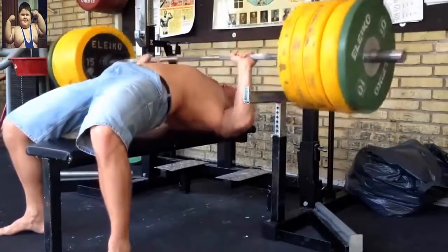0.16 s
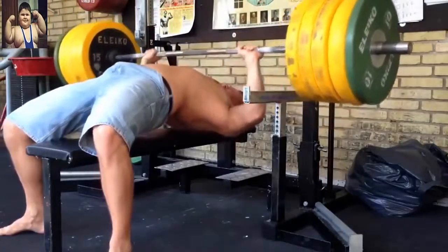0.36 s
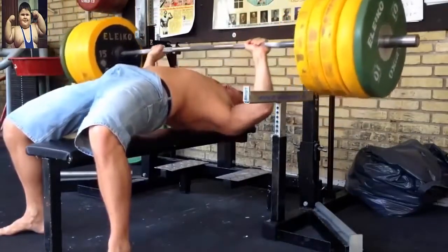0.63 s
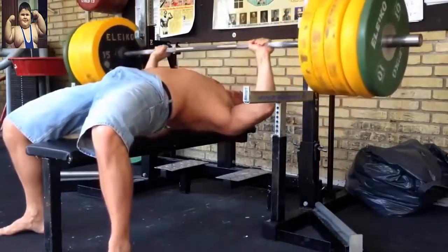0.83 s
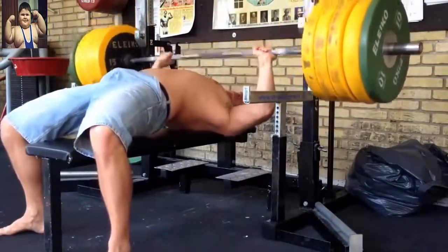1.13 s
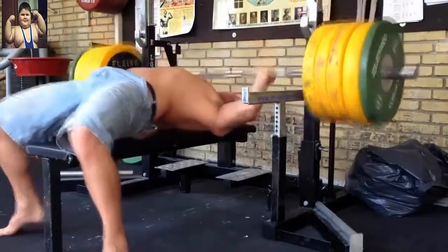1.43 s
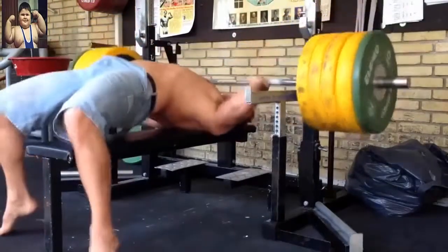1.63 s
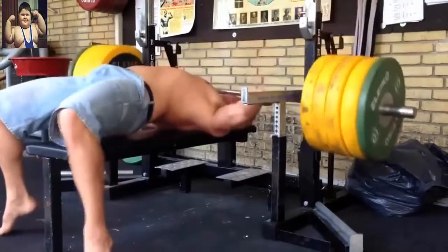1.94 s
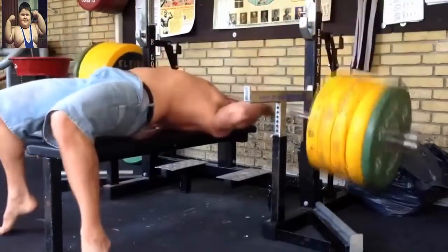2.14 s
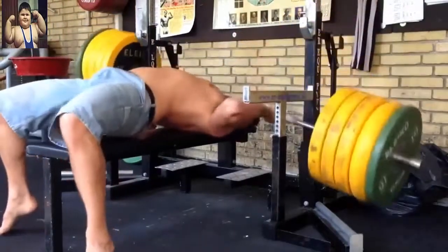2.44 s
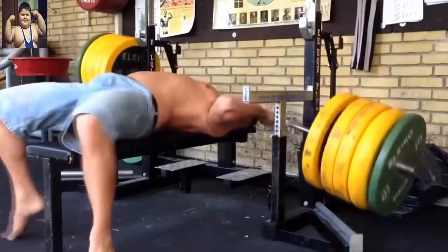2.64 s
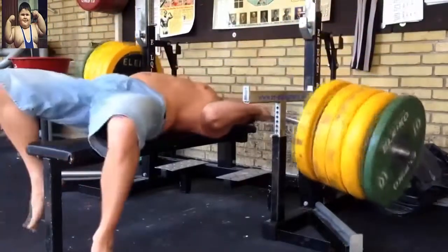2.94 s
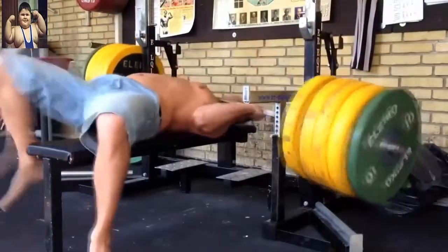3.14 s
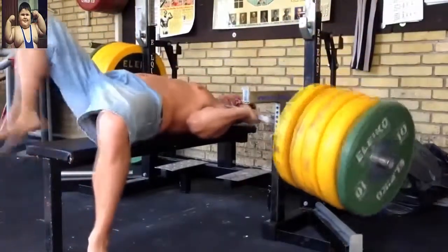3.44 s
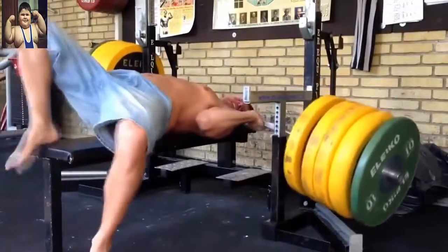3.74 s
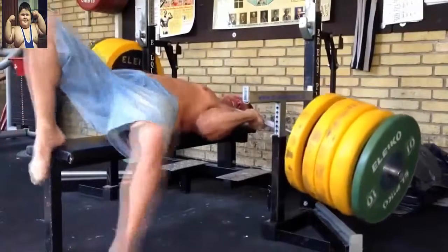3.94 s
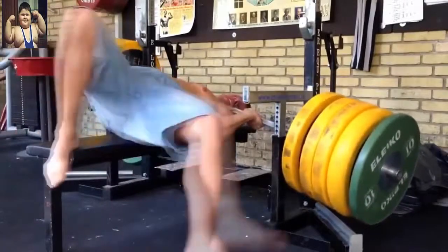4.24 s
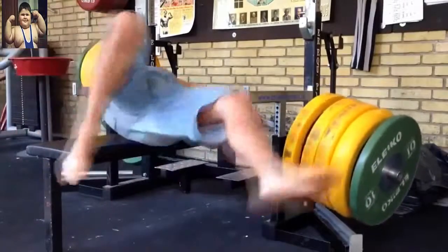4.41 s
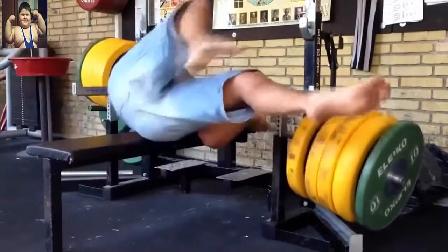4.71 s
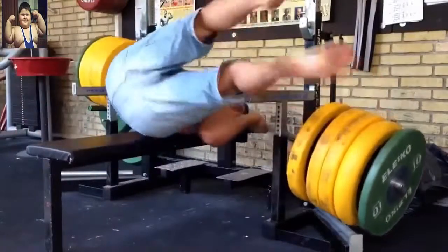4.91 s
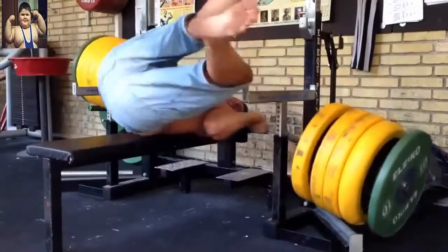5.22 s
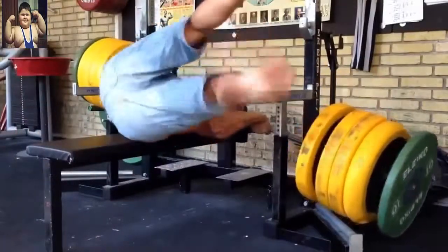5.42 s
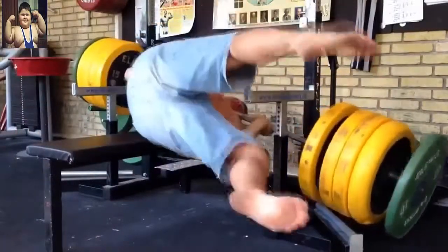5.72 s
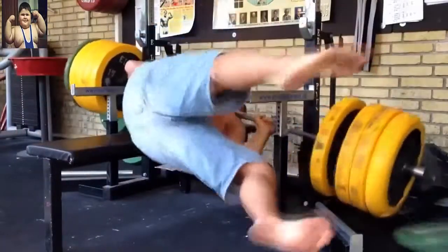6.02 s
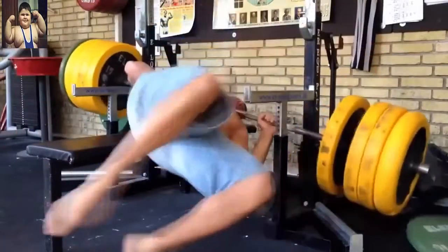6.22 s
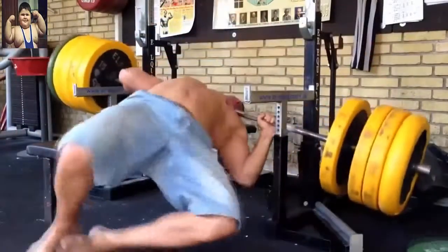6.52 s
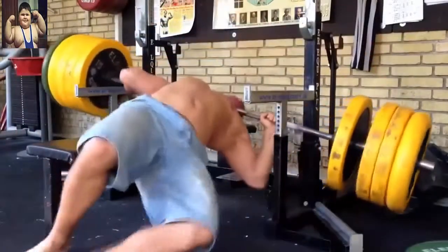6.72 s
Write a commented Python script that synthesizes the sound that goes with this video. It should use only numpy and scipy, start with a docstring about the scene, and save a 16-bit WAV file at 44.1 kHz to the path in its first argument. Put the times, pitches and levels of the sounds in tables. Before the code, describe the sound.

Faint bird chirps over quiet room hum, then a loaded barbell crashes on a steel rack with harsh clanging, rattles, thuds and late heavy plate knocks.

```python
"""In a small brick-walled gym a loaded barbell drops onto the steel arms of a rack, bounces, tips and slides.
Loose sleeves and rack rattle, rubber plates knock and thud on the floor mats: contact forces drive
decaying modes and broad knocks. Before the first crash a bird, hoarse gliding sines, chirps outside
over a faint room hum of shaped noise."""
import sys
import numpy as np
from scipy import signal
from scipy.fft import rfft, irfft, next_fast_len
from scipy.io import wavfile
from scipy.ndimage import uniform_filter1d

SR = 44100
rng = np.random.default_rng(int(sys.argv[2]) if len(sys.argv) > 2 else 0)


def master(y):
    """Save y as 16-bit WAV."""
    cut = np.clip(np.atleast_2d(y).T, -1, 1)
    pcm = np.round(cut * 32767)  # scale
    wavfile.write(sys.argv[1], SR, pcm.astype(np.int16))


N = 302681

# room hum spectrum, relative: freq_hz, density_db
HUM_SPECTRUM = [(13, -52), (22, -21.5), (38, -17.5), (139, -12.5), (177, -2.5), (224, -16), (277, -11.5),
                (469, -15), (955, -22), (2810, -28), (7080, -34), (12000, -58), (15600, -90), (22000, -120)]
# bird, one table a chirp: time_s, pitch_hz, level_db
CHIRPS = [
    [(0.72, 4530, -75), (0.748, 4265, -63.5), (0.86, 4280, -81)],
    [(0.97, 3960, -71), (1.006, 3350, -60), (1.09, 3450, -63.5)],
    [(1.13, 3870, -86), (1.136, 4080, -70), (1.25, 3350, -63.5)],
]
# blows: start_s, rack_db, bar_db, plate_db, rattle_t60_s (before the plates' factor), swell_ms, steel_focus_hz
BLOWS = [(1.2486, -42.5, -63, -69, 0.18, 3.6, 3180), (1.2981, -9.5, -18.5, -21.5, 0.96, 1.6, 2380),
         (1.3513, -15.5, -13.5, -27.5, 0.26, 3.4, 3860), (1.3882, -9.5, -23, -27.5, 0.13, 1.8, 1880),
         (1.5575, 1.5, -11, -35, 0.26, 20, 1620), (1.7895, -8.5, -21.5, -26, 0.49, 1.8, 1900),
         (1.9486, -13.5, -23.5, -23.5, 0.31, 4.3, 1060), (1.984, -27, -47, -27, 0.15, 9.1, 1900),
         (2.0573, -15, -20.5, -27, .19, 3.2, 2230), (2.1188, -28, -39, -25.5, 0.23, 4.1, 1980),
         (2.194, -22, -36, -26, 0.31, 4.1, 2080), (2.445, -22, -30, -38.5, 0.43, 1.2, 2950),
         (2.7085, -63, -62, -36, 0.051, 3.8, 2920), (3.015, -35.5, -48.5, -72.5, 1, 9.1, 1710),
         (3.1097, -29.5, -35.5, -37.5, 0.32, 4, 2200), (3.2147, -31, -60.5, -42, 0.24, 6.4, 2550),
         (3.2634, -25, -57.5, -36.5, 1, 16, 2420), (3.3727, -14, -17.5, -24.5, .16, 21, 2160),
         (3.3989, -14, -23, -32, 0.14, 2.9, 2220), (3.5299, -14.5, -20, -32.5, 0.34, 4, 1400),
         (4.3682, -60.5, -62.5, -51.5, 0.22, 7.6, 1070), (4.4485, -35.5, -64, -52.5, 1, 5.9, 2550),
         (4.488, -33, -36.5, -40.5, 0.64, 2.1, 2960), (4.5143, -28, -37, -46, 0.25, 3.9, 1610),
         (4.585, -33, -42, -38, 0.16, 7.3, 2460), (4.7118, -28, -31.5, -32.5, 0.2, 4.6, 960),
         (4.787, -47, -38.5, -49, 0.26, 2.5, 1510), (4.8677, -25.5, -34.5, -49, 0.44, 3.5, 2970),
         (4.921, -26.5, -31, -54, 0.18, 9.8, 2860), (5.1018, -63, -49, -43, 0.8, 1.5, 900),
         (5.1366, -18, -24.5, -32, 0.37, 6.2, 1090), (5.4492, -40, -34.5, -42, 0.2, 9.7, 1050),
         (5.468, -37, -29.5, -77, 0.13, 3.1, 1210), (5.5762, -29, -30, -43.5, 0.22, 4, 4250),
         (5.679, -42, -42, -49.5, 0.17, 3.9, 2900), (5.7955, -35.5, -38, -41, 0.24, 3.5, 3560),
         (5.9327, -32, -39, -33.5, 0.072, 1.5, 1880), (6.106, -34, -35.5, -57, 0.98, 27, 2840),
         (6.1554, -35, -32.5, -50, 0.58, 3.8, 3050), (6.1937, -14, -14.5, -11, 0.15, 3, 1010),
         (6.276, -38, -36, -37, 0.061, 4.6, 3000), (6.3483, -23.5, -48, -36, 0.1, 5.5, 3130),
         (6.495, -7, -14, -9, 0.076, 2.3, 923), (6.522, -30, -41, -14, 0.075, 3.2, 923),
         (6.5878, -22.5, -25, -26, 0.41, 12, 3670), (6.66, -48, -25.5, -20, 0.24, 7, 950)]
# sliding and shaking between blows, one table a spell: time_s, bar_db
SLIDES = [
    [(1.4, -41), (1.508, -24), (2.8, -52.5)],
    [(2.95, -56), (3.29, -29), (3.5, -40.5)],
    [(4.55, -43), (4.636, -55.5), (5.05, -57.5)],
    [(5.85, -49), (6.55, -36), (6.86, -69)],
]
# thuds of the load in the floor slab: start_s, level_db
THUDS = [(1.298, -32), (1.559, -18), (1.7875, -15.5), (1.9494, -30), (2.058, -26), (2.1205, -20),
         (2.195, -23), (3.084, -29), (3.1114, -26), (3.416, -27), (3.472, -27.5), (3.5299, -32),
         (4.7114, -31), (4.741, -26.5), (5.1389, -24), (5.4486, -44), (5.722, -31.5), (6, -21),
         (6.036, -35), (6.092, -34), (6.1557, -21), (6.1916, -24), (6.3573, -42), (6.4951, -40),
         (6.6654, -35)]
# shaping of clashing steel: freq_hz, gain_db
STEEL_COLOUR = [(290, -25.5), (500, -13), (611, 0), (667, -3.5), (1040, -3.5), (1310, -4), (1580, -5.5),
                (4020, 0.5), (5440, -7), (7670, -14.5), (8990, -24.5), (10400, -48.5), (15500, -45.5)]
# modes of the steel rack: freq_hz
RACK_MODES_HZ = [2188, 2440, 2684, 2822, 3110, 3237, 3560, 3900, 4080, 4820]
# modes of the bar: freq_hz
BAR_MODES_HZ = [830, 1060, 1183, 1315, 1534, 1620, 1744, 1900]
# modes of the rubber plates: freq_hz
PLATE_MODES_HZ = [233, 258, 331.6, 400, 472.7, 528, 611.6, 843]
# modes of the floor slab: freq_hz
FLOOR_MODES_HZ = [57.8, 74.4, 105, 132]
# echo decay: freq_hz, t60_s
ROOM_DECAY = [(80, 1), (400, 0.65), (1500, 0.53), (4000, 0.42), (9500, 0.3)]

HUM_DB, HUM_WANDER_DB = -60.5, 1.5
# sliding level against the bar
RACK_SLIDE_DB, PLATE_SLIDE_DB, FLOOR_SLIDE_DB = -0.5, -4.5, -15.5
# modes against the broad knock
RACK_RING_DB, BAR_RING_DB, FLOOR_RING_DB = -11, -8.5, -15.0
STACKED_RING_DB, LOOSE_RING_DB = -3.5, -2.5
# plates ring low while stacked on the bar, higher once the outer one is off and slaps flat
STACKED_FOCUS_HZ, LOOSE_FOCUS_HZ, PLATE_OFF_S = 315, 444, 6.1
STEEL_T60_S, PLATE_T60_S, FLOOR_T60_S = 0.035, 0.09, 0.2
# contact click against the rattle, before the cut for slow swells
STEEL_TICK_DB, PLATE_TICK_DB, FLOOR_TICK_DB = 19.5, 22, 28
THUD_T60_S, THUD_SWELL_MS = 0.16, 15
RACK_FOCUS_OCT, BAR_FOCUS_OCT, PLATE_FOCUS_OCT, FLOOR_FOCUS_OCT = 0.17, 0.3, 0.2, 0.15
TOP_HZ = 15650


def undb(db):
    """dB to gain."""
    return 10 ** (np.asarray(db) / 20)


def colour(x, table):
    """Shape by freq_hz, gain_db points joined on a log-frequency axis."""
    size = next_fast_len(len(x) + 2048)
    hz, db = np.transpose(table)
    bin_hz = np.arange(size // 2 + 1) * SR / size
    gain = undb(np.interp(np.log(bin_hz + 1), np.log(hz), db))
    return irfft(rfft(x, size) * gain, size)[:len(x)]


def curve(tables, column):
    """Gain of a dB column along each spell, silent outside, edges smoothed."""
    t, out = np.arange(N) / SR, np.zeros(N)
    for rows in tables:
        rows = np.array(rows)
        time_s = rows[:, 0]
        inside = (t >= time_s[0]) * (t < time_s[-1])
        out += undb(np.interp(t, time_s, rows[:, column])) * inside
    return uniform_filter1d(out, size=600)


def hum():
    """Room hum: shaped noise whose level wanders a little."""
    x = colour(rng.standard_normal(N), HUM_SPECTRUM)
    steps = np.repeat(rng.standard_normal(N // 2000 + 1), 2000)[:N]
    wander = uniform_filter1d(steps, size=2000)
    return x / np.std(x) * undb(HUM_DB + HUM_WANDER_DB * wander)


def bird():
    """Three faint whistles: a gliding sine made hoarse by slow noise on its amplitude."""
    t = np.arange(N) / SR
    rows = np.vstack(CHIRPS)
    pitch_hz = np.interp(t, rows[:, 0], rows[:, 1])
    tone = np.sin(2 * np.pi * np.cumsum(pitch_hz) / SR)
    hoarse = uniform_filter1d(uniform_filter1d(rng.standard_normal(N), size=90), size=90)
    return curve(CHIRPS, 2) * (1 + hoarse / np.std(hoarse)) * tone


def grit(spread_db):
    """Dense small collisions of uneven size, rms 1."""
    sizes = np.repeat(rng.exponential(size=N // 32 + 1), 32)[:N]
    x = rng.standard_normal(N) * undb(spread_db * sizes)
    return x / np.std(x)


def force(start_s, blow_db, t60_s, swell_ms, slide, tick_db, spread_db):
    """Force on one body: each blow is a contact and a rattle that swells and dies; sliding fills the gaps."""
    rattle, ticks = slide.copy(), np.zeros(N)
    for s, db, t60, ms in np.broadcast(start_s, blow_db, t60_s, swell_ms):
        i, rise_s = int(s * SR), max(ms / 1000, 1 / SR)
        t = np.arange(min(SR, N - i)) / SR
        rattle[i:i + len(t)] += undb(db) * (1 - np.exp(-t / rise_s)) * 1000. ** (-t / t60)
        # glancing blows swell slowly and click less
        ticks[i] += undb(db + tick_db) / (1 + rise_s / 0.005)
    return rattle * grit(spread_db) + ticks


def body(push, modes_hz, lo_hz, hi_hz, t60_s, ring_db, focus_hz, focus_oct):
    """A broad knock plus decaying modes; each blow lands on another spot and favours modes near its focus."""
    band = signal.butter(3, [lo_hz, hi_hz], "band", fs=SR, output="sos")
    out = signal.sosfilt(band, push) * np.sqrt(SR / 2 / (hi_hz - lo_hz))
    # every moment belongs to the latest blow
    blow = np.searchsorted(np.array(BLOWS)[:, 0], np.arange(N) / SR + 1e-3) - 1
    blow = np.clip(blow, 0, None)
    r = 1000. ** (-1 / (t60_s * SR))
    for hz in modes_hz:
        # the contact wanders, so each mode comes and goes within a rattle
        luck_db = np.repeat(rng.uniform(-9, 3, N // 900 + 1), 900)[:N]
        nearness = np.exp(-.5 * (np.log2(hz / focus_hz) / focus_oct) ** 2)
        share = undb(ring_db) * (0.35 + nearness)
        w = 2 * np.pi * hz / SR
        drive = push * share[blow] * undb(luck_db)
        gain = np.sqrt(2 - 2 * r * r) * np.sin(w)
        out += signal.lfilter([gain], [1, -2 * r * np.cos(w), r * r], drive)
    return out


def patchy(x, depth_db):
    """The many close upper modes of loose steel flare and fade in patches about 350 Hz by 25 ms."""
    spec = signal.stft(x, SR, nperseg=256)[2]
    cells = rng.uniform(-1.015, 1, spec.shape)
    cells = uniform_filter1d(uniform_filter1d(cells, size=2, axis=0), size=8, axis=1)
    return signal.istft(spec * undb(depth_db * cells / np.std(cells)), SR, nperseg=256)[1][:N]


def steel(slide):
    """Rack and bar clash: each rings from its share of every blow and of the sliding."""
    s, rack_db, bar_db, _, t60_s, swell_ms, focus_hz = np.transpose(BLOWS)
    rack_push = force(s, rack_db, t60_s, swell_ms, undb(RACK_SLIDE_DB) * slide, STEEL_TICK_DB, 1.3)
    rack = body(rack_push, RACK_MODES_HZ, 3100, .45 * SR, STEEL_T60_S, RACK_RING_DB,
                focus_hz, RACK_FOCUS_OCT)
    bar_push = force(s, bar_db, t60_s, swell_ms, slide, STEEL_TICK_DB, 0.74)
    bar = body(bar_push, BAR_MODES_HZ, 640, 3000, STEEL_T60_S, BAR_RING_DB, focus_hz, BAR_FOCUS_OCT)
    return colour(patchy(rack + bar, 3.5), STEEL_COLOUR)


def plates(slide):
    """Rubber plates knock; their rattle dies sooner than the steel's."""
    s, _, _, plate_db, t60_s, swell_ms, _ = np.transpose(BLOWS)
    stacked = s < PLATE_OFF_S
    focus_hz = np.where(stacked, STACKED_FOCUS_HZ, LOOSE_FOCUS_HZ)
    ring_db = np.where(stacked, STACKED_RING_DB, LOOSE_RING_DB)
    push = force(s, plate_db, 0.83 * t60_s, swell_ms, undb(PLATE_SLIDE_DB) * slide, PLATE_TICK_DB, 0.85)
    return body(push, PLATE_MODES_HZ, 180, 900, PLATE_T60_S, ring_db, focus_hz, PLATE_FOCUS_OCT)


def floor(slide):
    """Floor slab: low modes driven by the thuds of the load and a little sliding."""
    push = force(*np.transpose(THUDS), THUD_T60_S, THUD_SWELL_MS, undb(FLOOR_SLIDE_DB) * slide,
                 FLOOR_TICK_DB, 4.6)
    focus_hz = np.full(len(BLOWS), 66.)
    return body(push, FLOOR_MODES_HZ, 47, 220, FLOOR_T60_S, FLOOR_RING_DB, focus_hz, FLOOR_FOCUS_OCT)


def barbell():
    """Rack, bar and plates, and the floor under them, sharing one sliding motion."""
    slide = curve(SLIDES, 1)
    # thuds and plate knocks carry little below about 52 Hz
    deep_cut = signal.butter(3, 52, "high", fs=SR, output="sos")
    return steel(slide) + signal.sosfilt(deep_cut, plates(slide) + floor(slide))


def room(wet_db, build_s):
    """Impulse response: direct sound, then echoes that thicken and die away, treble first."""
    t = np.arange(SR) / SR
    hz, _, spec = signal.stft(rng.standard_normal(SR), SR, nperseg=256)
    frame_s = np.arange(spec.shape[1]) * 128 / SR
    decay_hz, decay_t60_s = np.transpose(ROOM_DECAY)
    t60_s = np.interp(np.log(hz + 1), np.log(decay_hz), decay_t60_s)
    tail = signal.istft(spec * 1000. ** (-frame_s / t60_s[:, None]), SR, nperseg=256)[1][:SR]
    tail = tail * (1 - np.exp(-t / build_s))
    # unit energy, so wet_db is the echo level against the direct sound
    return (t == 0) + undb(wet_db) * tail / np.sqrt(np.sum(tail ** 2))


def scene():
    """Barbell and bird heard through the room, over the hum."""
    wet = signal.fftconvolve(barbell() + bird(), room(wet_db=-7.5, build_s=0.00058))[:N]
    return (wet + hum())[None]


def record(dry):
    """The recorder rounds the loudest peaks and cuts the top."""
    rounded = np.tanh(.7 * dry) / .7
    top_cut = signal.ellip(12, .2, 100, TOP_HZ, fs=SR, output="sos")
    return signal.sosfilt(top_cut, rounded)


dry = scene()
out = record(dry)
master(out)
```